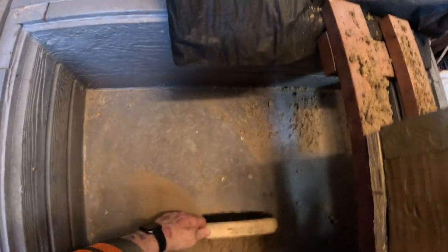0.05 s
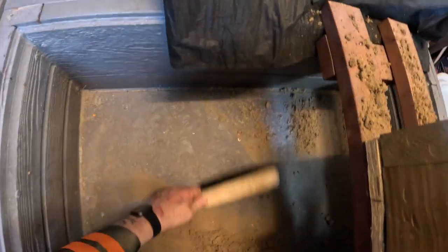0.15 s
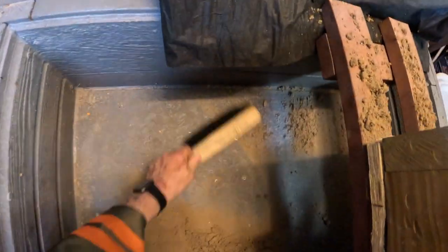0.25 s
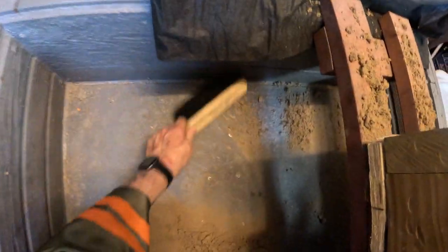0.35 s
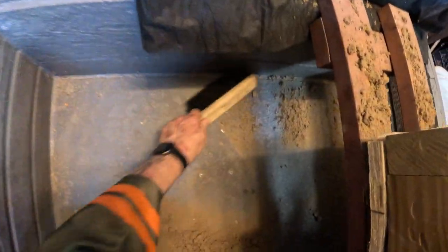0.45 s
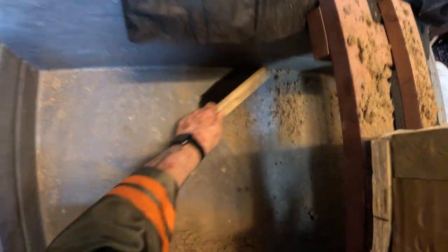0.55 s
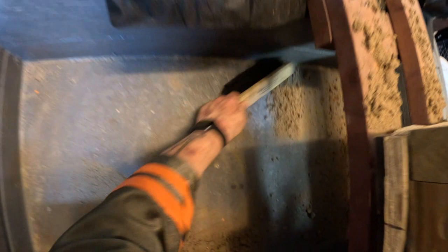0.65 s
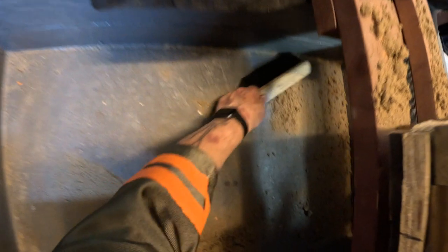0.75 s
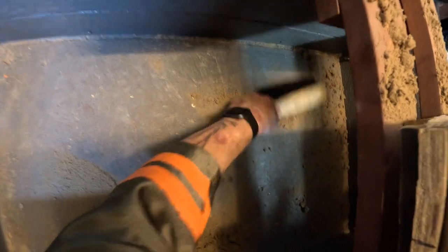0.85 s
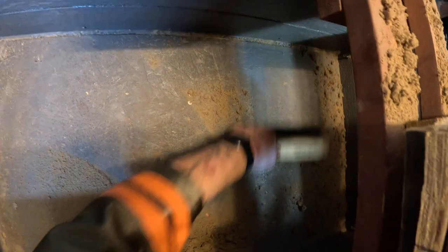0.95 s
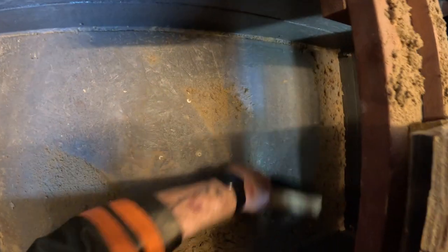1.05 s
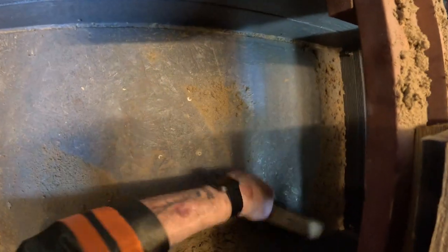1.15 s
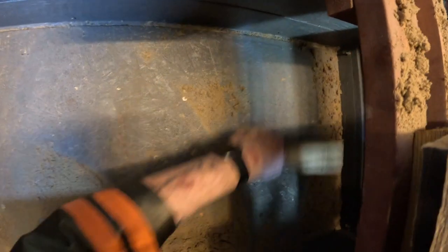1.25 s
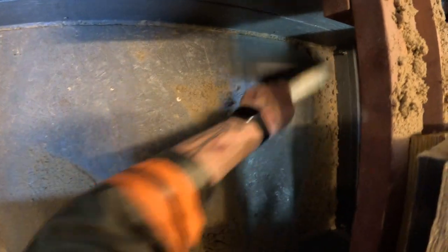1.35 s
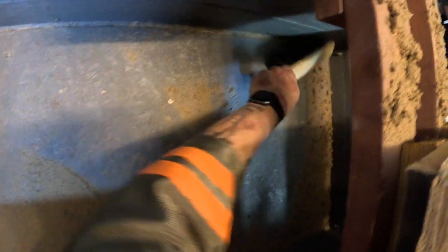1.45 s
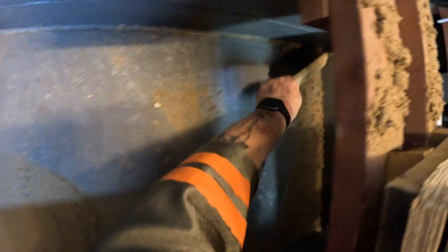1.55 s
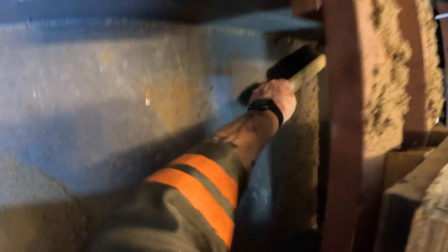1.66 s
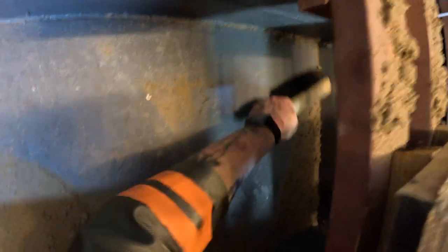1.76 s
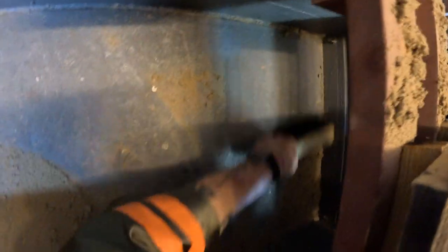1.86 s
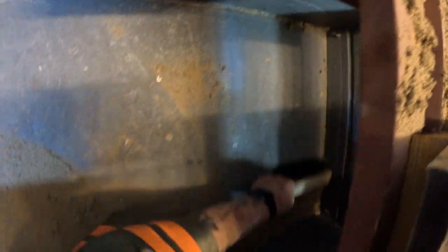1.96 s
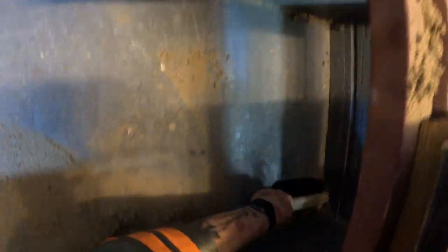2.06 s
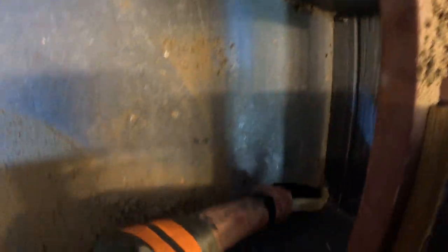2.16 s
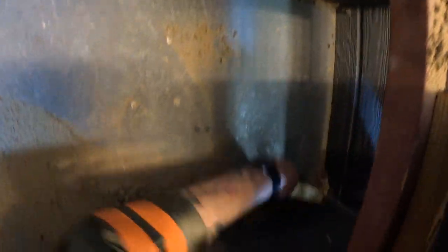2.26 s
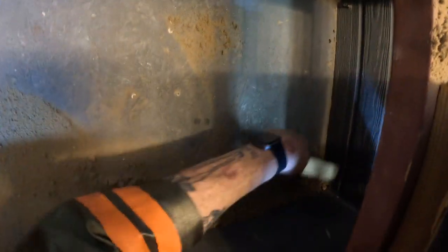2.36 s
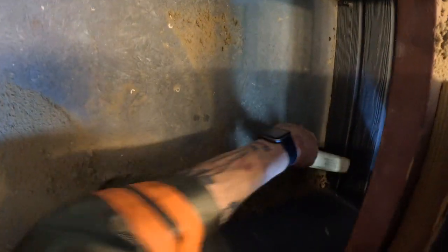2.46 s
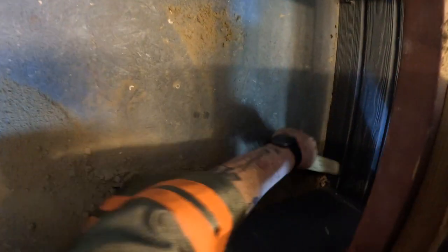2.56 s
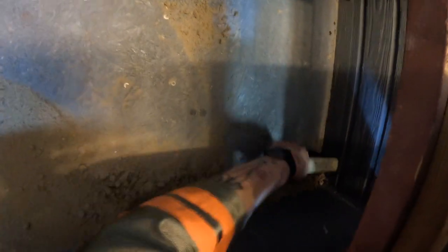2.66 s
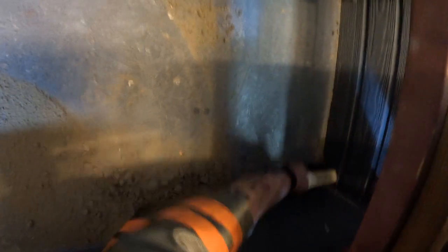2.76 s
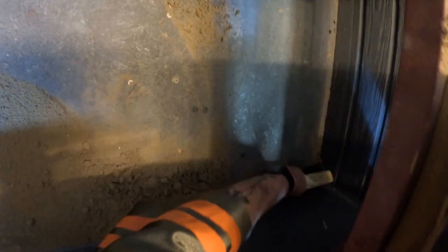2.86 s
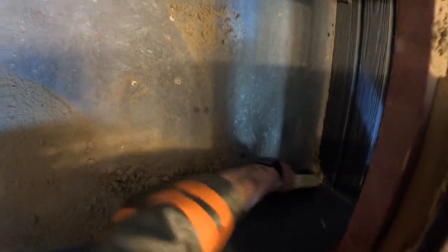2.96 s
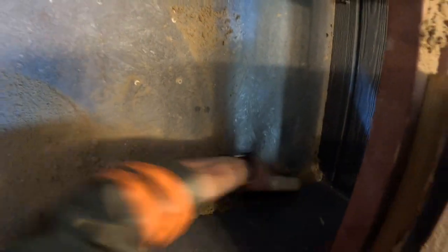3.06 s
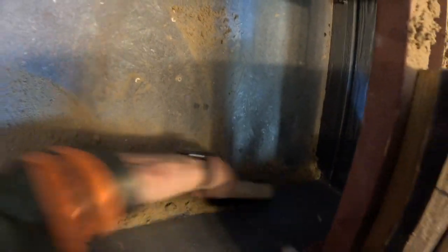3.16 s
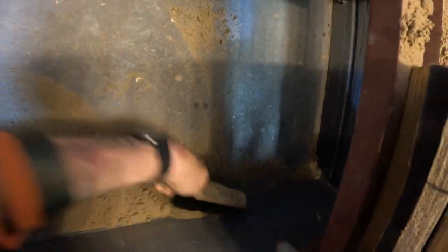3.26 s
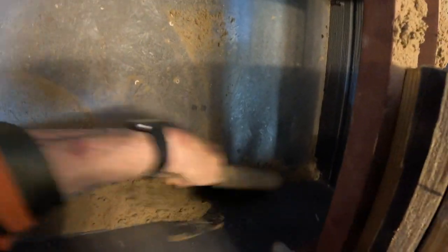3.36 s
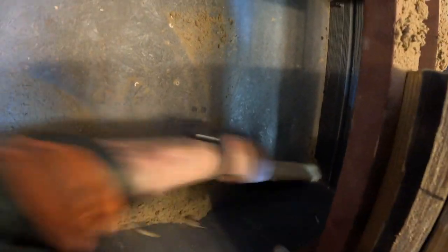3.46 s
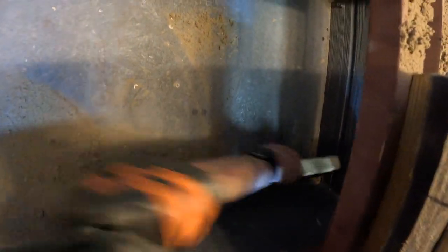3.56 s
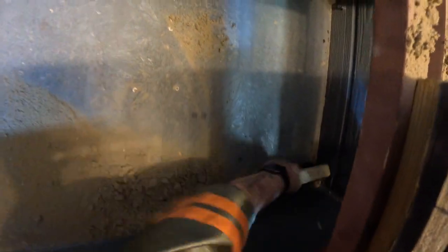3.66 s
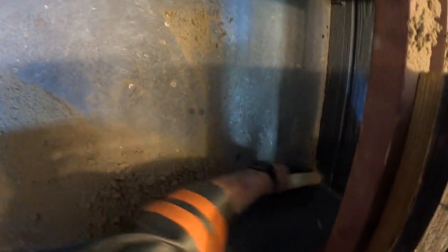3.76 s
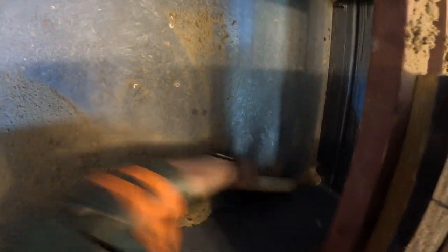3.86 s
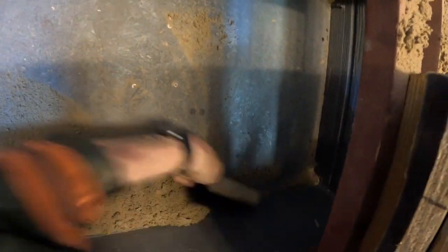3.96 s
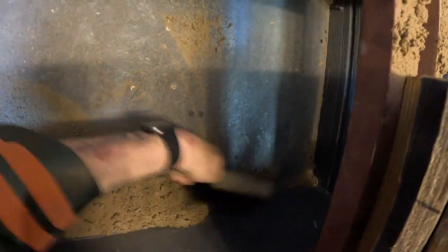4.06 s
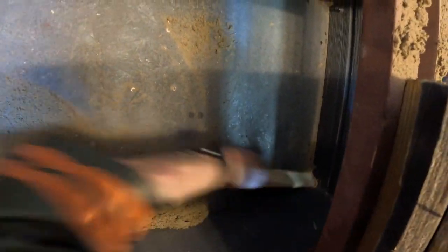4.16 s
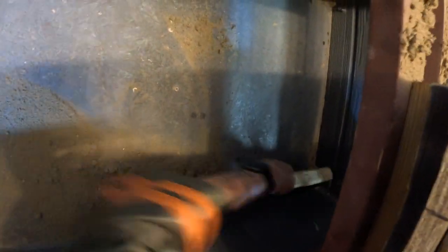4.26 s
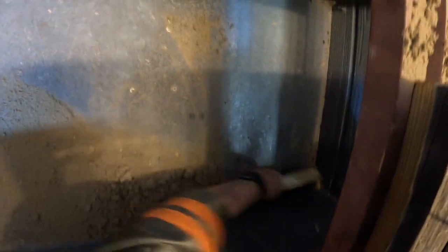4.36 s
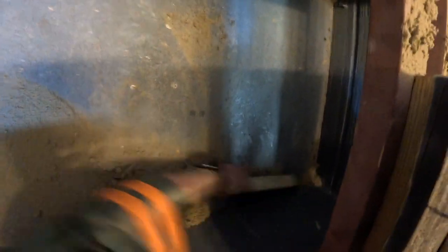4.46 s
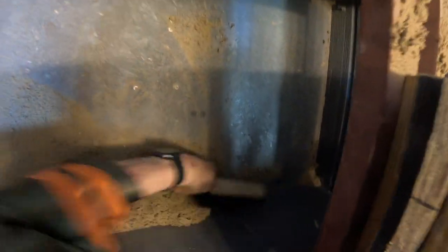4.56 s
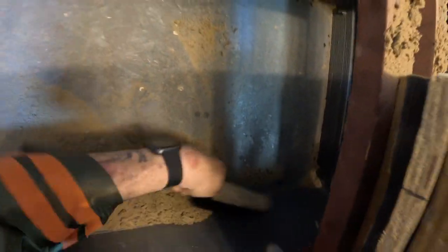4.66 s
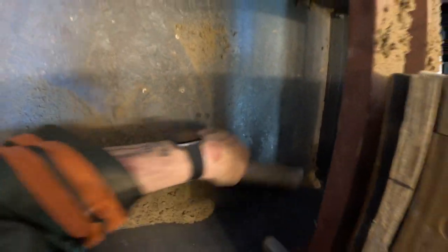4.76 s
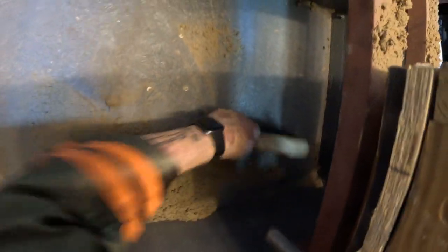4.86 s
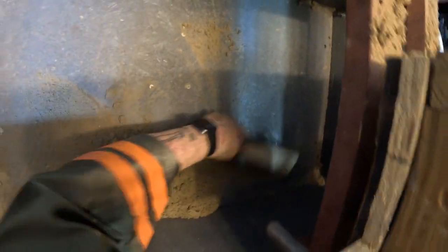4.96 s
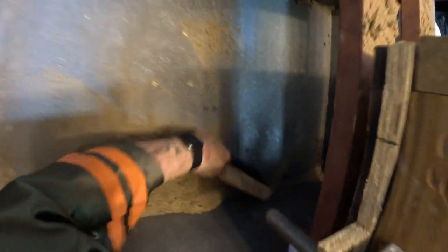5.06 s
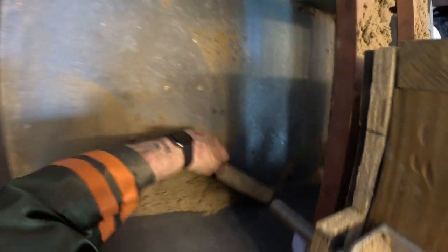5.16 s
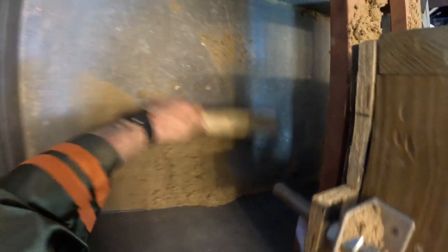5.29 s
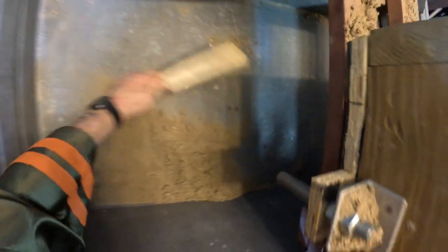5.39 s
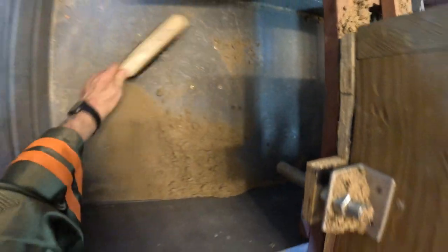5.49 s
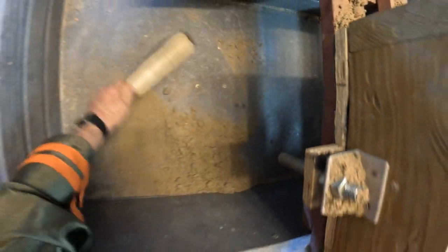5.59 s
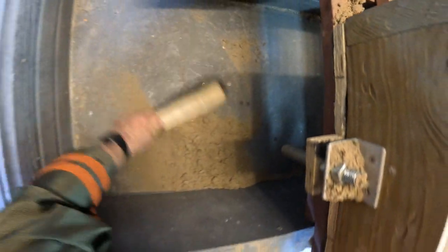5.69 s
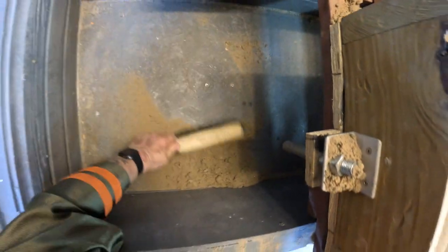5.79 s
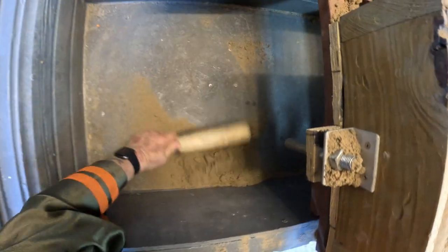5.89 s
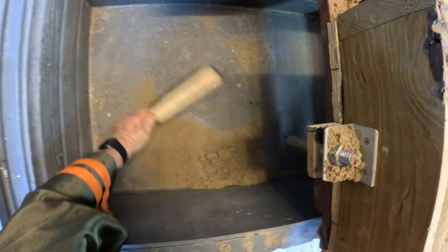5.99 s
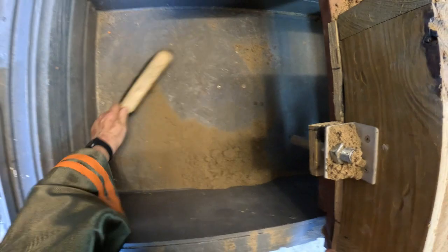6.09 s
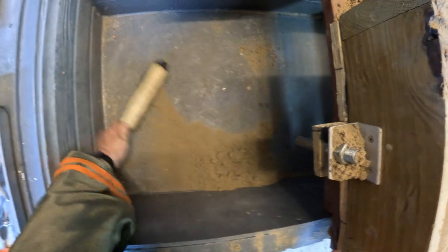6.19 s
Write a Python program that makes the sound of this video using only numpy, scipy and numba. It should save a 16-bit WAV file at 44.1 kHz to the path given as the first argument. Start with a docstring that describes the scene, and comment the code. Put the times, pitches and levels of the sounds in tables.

```python
"""A stiff hand brush sweeps loose sand over a large sheet tray in a small workshop, heard at arm's length.
A low room hum lies underneath, and the first stroke is already crunching through the grains as the scene opens.
Stroke follows stroke: bristles slap down, hiss and drag as shaped noise, and shake the tray's modes into a rumble.
Between and within strokes, whistling bands sound through moving resonances, and stray grains tick as noise bursts.
From 0.45 s the wooden back knocks and from 1.75 s also judders, ringing the tray, loudest from 1.7 to 5.2 s."""
import sys
import numpy as np
from scipy import signal
from scipy.fft import rfft, irfft, next_fast_len
from scipy.io import wavfile
from scipy.ndimage import uniform_filter1d
from numba import njit

SR = 44100
rng = np.random.default_rng(int(sys.argv[2]) if len(sys.argv) > 2 else 0)


def waveform_to_disk(signal):
    """Save audio, clipped to [-1, 1], as 16-bit WAV at the path in sys.argv[1]."""
    frames = np.transpose(np.atleast_2d(signal))
    scaled = np.clip(frames, -1, 1) * 32767
    samples = np.round(scaled).astype(np.int16)
    wavfile.write(sys.argv[1], SR, samples)


N = 274743
PADDED = next_fast_len(N)

# Colour of the workshop hum. Each row: frequency in Hz, relative level in dB per Hz.
HUM_COLOUR = [(12, -44.5), (20, -3), (45, -6.5), (65, -1.5), (92, -4.5), (132, -4.5), (211, -37.5),
              (360, -25), (560, -37), (850, -44.5), (1500, -30.5), (2690, -38), (3970, -35), (5240, -36),
              (8380, -44.5), (10800, -47.5), (15000, -65.5)]
HUM_DB = -48.5
# Faint treble rustle in the pauses. Each row: time in seconds, level in dB over the hum's own treble.
RUSTLE = [(0.2, -19), (0.36, -1.5), (0.44, 0.5), (2.4, -5), (2.6, 1), (2.7, 1), (3.44, -7), (3.54, -5.5),
          (3.61, -4), (3.65, 3.5), (3.698, -0.5), (3.77, 6.5), (4.15, 8), (4.25, -2), (4.44, 0.5),
          (5.3, 4.5), (5.36, -2), (5.45, -1.5), (5.55, -8), (6.1, 3), (6.22, -4)]
# Stereo width. Each row: frequency in Hz, side level over mid level in dB for equal inputs.
WIDTH = [(25, -7), (60, -32), (150, -25), (300, -12), (1000, -11), (2500, -6), (5000, -10), (8000, -12),
         (12000, -9)]
ROOM_T60_S, ROOM_DB = 0.29, -12.5

# Grains and bristle tips that tick alone. Each row: time in seconds, relative level in dB, centre in Hz.
TICKS = [(0.0967, -26.5, 4800), (0.3395, -44, 7500), (0.871, -20.5, 3440), (1.497, -27, 3000),
         (1.537, -21.5, 3500), (1.619, -23, 4700), (3.7367, -43, 5000), (3.8786, -40, 3000),
         (3.886, -19, 2850), (4.287, -33, 4240), (4.35, -50, 3500), (4.836, -34, 5000), (4.866, -42, 7500),
         (4.98, -36, 3250), (5.375, -42.5, 3700), (5.407, -49, 4600), (5.5508, -49, 3700),
         (6.021, -41, 7500), (6.075, -41, 5000), (6.148, -43, 6570)]

# Ringing modes of the tray. Each row: pitch in Hz, relative level in dB, free ring time (t60) in seconds.
TRAY_MODES = [(73.8, -4.5, 0.2), (96, -2.5, 0.23), (117.04, -0.5, 0.31), (143, 3, 0.13),
              (169.7, -2.5, 0.17), (215.8, -1.5, 0.19), (236, -7, 0.27), (262.2, -2, 0.19),
              (319.4, 4.5, 0.052), (366.2, -0.5, 0.13), (410.5, -0.5, 0.087), (463.5, -1.5, 0.17),
              (544, -3.5, 0.096), (597, -5, 0.14), (650, -10.5, 0.044), (757, -2, 0.086), (877, -7, 0.048),
              (946, -4.5, 0.09), (958, 1, 0.084), (1094, 0, 0.038), (1241, -3.5, 0.044), (1492, 3, 0.03),
              (1670, 4, 0.019), (1787, 3.5, 0.031), (2160, -3, 0.026), (2610, -2, 0.034), (2780, 1, 0.013),
              (3480, -2, 0.0059)]
# Where wood meets tray. Each name: strongest low pitch in Hz, strongest high pitch in Hz, then the
# relative mode level in dB near each of the knock bands.
SPOTS = {"floor": (122, 1501, -5, -24, -40, -24, -10), "flat": (119.5, 1349, -13.5, -24.5, -24, -12, -11),
         "middle": (278, 1468, -17, -3, -26, -29, -19), "heel": (145.5, 904, -3.5, -16, -22.5, -48, -39),
         "edge": (368, 937, -21, -8.5, -14.5, -11, -29), "wall": (267, 547, -15.5, -8, -9, -25, -34),
         "slide": (222, 547, -4, -4, -11, -11, -22.5), "corner": (463.5, 1122, -11.5, -15, -5, -14, -47),
         "rim": (159, 865, -7.5, -7.5, -4.5, -15.5, -41), "brim": (606, 980, -13, -7, -12, -15.5, -41),
         "belly": (118, 366, -3.5, -20, -36, -40, -50), "knuckle": (219, 545, -6.5, -2, -10.5, -22, -17),
         "nook": (469, 1120, -14, -15, -7.5, -12, -48), "rub": (266, 758, -9.5, -12, -12.5, -13.5, -30),
         "rattle": (264, 964, -3.5, -5, -11.5, -13, -13), "lip": (241, 2607, -5.5, -9, -9.5, -10.5, -23),
         "side": (544, 1490, -12, -7.5, -11.5, -15.5, -17), "foot": (263, 798.5, -7.5, -8.5, -8, -16, -30),
         "seam": (268, 411, -5.5, -8.5, -10, -16.5, -30.5), "tips": (93.5, 1301, -11, -3, -17, -13, -4.5)}
# Band centres for the colour of a blow. Each entry: frequency in Hz.
KNOCK_BANDS_HZ = [125, 280, 650, 1500, 4000]
FAVOUR_DB, FAVOUR_WIDTH = 12.5, 0.091  # lift of a spot's two pitches; its width in natural log of Hz
# Knocks of the wooden back. Each row: time in seconds, relative level in dB, hardness in dB gained per band
# upwards, share of the free ring time, spot.
KNOCKS = [(0.451, -14, 1, 1.2, "flat"), (1.185, -24, -8, 0.47, "edge"), (1.29, -21.5, -1, 0.64, "edge"),
          (1.434, -22, -0.5, 0.54, "heel"), (1.522, -19, 2, 0.53, "heel"),
          (1.553, -23.5, 1.5, 0.88, "edge"), (1.619, -14.5, -0.8, 0.49, "heel"),
          (1.689, -12.5, -1, 0.44, "heel"), (1.729, 2, 0, 0.78, "lip"), (1.81, -19, 0, 0.6, "side"),
          (1.839, -17, 2.5, 0.54, "side"), (1.862, -9.5, 2.5, 0.68, "slide"), (1.882, -8, 0, 1.06, "slide"),
          (1.941, -5, -1.5, 0.7, "knuckle"), (1.965, -6.5, -0.5, 0.77, "side"),
          (2.258, -4.5, -2.5, 0.57, "corner"), (2.299, -10, -3, 0.61, "nook"),
          (2.321, -8.5, -2, 0.35, "nook"), (2.721, -13, -1.2, 0.89, "tips"),
          (2.738, 4.5, -0.5, 0.61, "foot"), (2.895, -6.5, -3, 0.58, "wall"),
          (3.789, -18, 3.5, 0.37, "tips"), (3.804, 0.5, 0, 0.99, "seam"), (4.459, -18.5, 4, 0.86, "corner"),
          (4.731, -25, -3.5, 0.59, "floor"), (4.837, -20, 2.5, 0.71, "floor"),
          (4.889, -19.5, -0.6, 0.92, "floor"), (4.948, -24.5, 2, 0.96, "floor"),
          (5.028, 3.5, 0.5, 0.52, "middle"), (5.03, -5.5, -1.5, 1.03, "belly"),
          (5.184, -1.5, -1.1, 0.93, "rim"), (5.237, -26, -3, 0.6, "rim"), (5.249, -18, -6, 0.55, "rim"),
          (5.256, -17, -1.5, 0.3, "heel"), (5.595, -18.5, -4.5, 1.05, "flat")]
SCATTER_DB = 1.2  # random spread of mode levels from blow to blow
# Crack of a blow. Each row: lower edge in Hz, upper edge in Hz, level in dB over the blow's band, t60 in seconds.
CRACKS = [(300, 930, -15, 0.12), (1010, 3050, -8.5, 0.038), (2180, 5400, -8.5, 0.027),
          (500, 1280, -5, 0.012)]
CRACK_RISE_S = 0.0018
# The wooden back judders along a wall. Each row: start in seconds, end in seconds, level in dB at the start,
# level in dB at the end, spot.
SCRAPES = [(1.75, 1.863, -20, -20.5, "rub"), (1.868, 1.937, -12, -20, "rattle"),
           (2.752, 2.86, -17.5, -24, "wall"), (3.812, 3.888, -22.5, -16, "rub"),
           (5.047, 5.091, -19, -20, "middle"), (5.203, 5.263, -23.5, -11.5, "brim"),
           (5.265, 5.34, -28, -42, "wall")]
JUDDERS_PER_S, JUDDER_SHARE = 250, 0.45  # mean catches at each contact point; share of the free ring time
JUDDER_FAVOUR, JUDDER_DETUNE = 0.5, 0.04  # share of a spot's favour; random spread as a share of pitch

# Colours of fine sand, coarse sand and bristle drag. Each row: frequency in Hz, relative level in dB per Hz.
FINE_COLOUR = [(2120, -41), (3600, -1.5), (6370, -4.5), (7230, -4.5), (8600, -12.5), (10500, -12),
               (13600, -26.5), (14200, -21.5), (15100, -53.5)]
COARSE_COLOUR = [(1200, -6.5), (1900, 3), (2600, 2.5), (3400, -0.5), (5000, -35.5)]
DRAG_COLOUR = [(300, -9.5), (600, -6), (950, 2), (1400, 1), (1900, -2), (2800, -60.5)]
# Brush strokes. Each row: contact ramp start in seconds, a level time in seconds, fade start in seconds (any
# order), fine sand level in dB at those three moments once sorted in time, fade in dB per second, coarse sand
# in dB over the fine, drag in dB over the fine, tray rumble in dB when the fine sand is at its third level.
STROKES = [(-0.1, 0.0, 0.097, -46, -44.5, -41.5, 163, 0, -4.5, -41),
           (0.48, 0.55, 0.67, -48, -51.5, -49.5, 148, -1, -2, -54),
           (0.636, 0.696, 1.01, -62, -44.5, -40.5, 100, -0.5, -1.5, -39.5),
           (0.897, 1.05, 1.221, -67, -39.5, -38.5, 402, -2, -2, -41.5),
           (1.238, 1.287, 1.275, -45, -56, -42.5, 200.3, 1.5, -2, -38.5),
           (1.409, 1.577, 1.78, -60.5, -50.5, -48.5, 250, 2, -1.5, -40.5),
           (1.792, 1.94, 2.176, -50, -33.5, -40, 103, -2.5, -4, -43),
           (2.294, 2.307, 2.218, -65, -36, -25.5, 312, -1, 2, -50),
           (2.766, 2.867, 2.96, -54, -46.5, -56.5, 160, -3, 1.5, -38.5),
           (2.953, 3.223, 3.394, -56.5, -37.5, -42, 340, -1, 1, -68),
           (3.83, 3.891, 4.047, -72, -39, -36.5, 210, 0.5, -0.5, -47.5),
           (4.49, 4.575, 4.679, -44.5, -34.5, -34.5, 181, -3.5, -1.5, -49),
           (5.045, 5.106, 5.11, -44, -33.5, -31.5, 243, -2.5, -1.5, -42),
           (5.207, 5.233, 5.32, -52, -49.5, -70, 203, 2, 6, -55.5),
           (5.604, 5.727, 5.8, -48, -49, -53, 150, -4.5, -6.5, -48.5),
           (5.713, 5.852, 5.924, -50, -34, -39.5, 440, -12, -27, -76),
           (6.115, 6.158, 6.3, -71, -56, -56.5, 130, -20, -28, -89)]
CONTACT_S, RUMBLE_SHARE = 0.024, 0.65  # contact ramp; the rumble moves by this share of the hiss's dB
SETTLE_DB, SETTLE_S = -29.5, 0.022  # thrown sand trickles on after the bristles
# The bristles slap down. Each row: time in seconds, fine sand level in dB.
LANDINGS = [(0.45, -33.5), (1.727, -70), (2.258, -67), (2.721, -32.5), (2.74, -59), (3.789, -31),
            (4.458, -29.5), (5.025, -30), (5.599, -45.5)]
SLAP_RISE_S, SLAP_FADE_DB_S = 0.01, 605
SLAP_COARSE_DB, SLAP_DRAG_DB = 1, 1  # over the fine sand
# Whistling bands between and within strokes. Each row: start in seconds, end in seconds, coarse sand in dB at
# the start and at the end, lower and upper whistle pitch in Hz before sag and wander, their levels in dB over
# the coarse sand, tray rumble in dB.
WHISTLES = [(0.1, 0.376, -50.5, -62, 1830, 2600, 5.5, -16, -59),
            (1.367, 1.584, -47, -55, 1860, 3400, 7.5, -7.5, -69),
            (2.355, 2.627, -59, -73, 1830, 2500, 9, -6.5, -52.5),
            (3.402, 3.54, -73, -62.5, 1780, 2380, 10, -7, -58),
            (4.082, 4.282, -80, -93.5, 1490, 2940, 16, 3, -52),
            (4.559, 4.66, -41, -39, 1740, 1050, 5.5, -22, -70),
            (4.73, 5.085, -59, -51, 1800, 3390, 7, -3.5, -53.5),
            (5.362, 5.611, -73.5, -58.5, 1970, 2670, 2.5, -10, -57),
            (5.745, 5.931, -63, -55, 1440, 2960, 8, -3, -80),
            (5.827, 5.882, -64, -66, 4250, 5200, 1, -5, -73),
            (5.904, 6.094, -54, -51, 1870, 2630, 0, -8, -49.5)]
WHISTLE_FINE_DB, WHISTLE_DRAG_DB = -16, -12  # sand that goes with a whistle, over its coarse sand
WHISTLE_EDGE_S, WHISTLE_SAND_PAN_DB = 0.075, 1.5  # fade ramp; left minus right
STILL_RUMBLE_DB = -61
STEP = 8  # samples for each gain value
# Ring times of the lower and the upper whistle band. Each entry: t60 in seconds.
WHISTLE_T60_S = (0.016, 0.032)
WANDER, SAG_PER_S = 0.015, 0.12  # share of pitch; share of pitch lost per second
SWELL_DB = 1.2

# Treble balance of the left port. Each row: frequency in Hz, level in dB over the right port.
LEFT_PORT = [(3000, 0), (6000, -0.06), (9000, 1), (13000, 1.4)]
PORT_LAG_S, TOP_HZ = 1.1e-5, 14900
LIMIT_DB, LIMIT_RATIO, ATTACK_S, RELEASE_S = -15, 1.36, 0.0013, 0.075


def undb(db):
    """Turns dB into a gain."""
    return 10 ** (np.asarray(db) / 20)


def unit(x):
    """Scales a sound to an RMS of 1."""
    return x / np.sqrt(np.mean(x ** 2))


def colour(x, table):
    """Filters by a (Hz, dB) table, interpolated over log frequency."""
    hz, db = np.transpose(table)
    f = np.maximum(np.fft.rfftfreq(PADDED, 1 / SR), 1)
    gain = undb(np.interp(np.log(f), np.log(hz), db))
    return irfft(rfft(x, PADDED) * gain, PADDED)[..., :x.shape[-1]]


def walk(rate):
    """Random levels held for 1 / rate s and smoothed twice, with an RMS of 1."""
    hold = int(SR / rate)
    steps = np.repeat(rng.standard_normal(N // hold + 1), hold)
    return unit(uniform_filter1d(uniform_filter1d(steps, hold), hold)[:N])


def spread(mid, side):
    """Left and right from a centre sound and an unrelated side sound."""
    side = colour(side, WIDTH)
    return np.array([mid + side, mid - side])


def hum():
    """The workshop's low, wavering noise; its faint treble follows the rustle levels and flickers."""
    mid, side = (unit(colour(rng.standard_normal(N), HUM_COLOUR)) for _ in range(2))
    both = spread(mid, side)
    bass = signal.sosfilt(signal.butter(2, 500, fs=SR, output="sos"), both)
    treble = both - bass
    bass_db = 1.5 * walk(13) + 1.8 * walk(4)
    treble_db = np.interp(np.arange(N) / SR, *np.transpose(RUSTLE)) + walk(18)
    return undb(HUM_DB) * (bass * undb(bass_db) + treble * undb(treble_db))


def room(x):
    """Close walls answer with a short, dull noise tail, partly different left and right."""
    t = np.arange(int(.5 * SR)) / SR
    tails = rng.standard_normal((2, len(t))) * 1000 ** (-t / ROOM_T60_S) * (t > .003)
    tails = colour(tails / np.sqrt(np.sum(tails[0] ** 2)), [(200, 3.5), (2000, 4.5), (8000, -14)])
    mid, side = (signal.fftconvolve(x, tail)[:N] for tail in tails)
    return undb(ROOM_DB) * spread(mid, undb(6.0) * side)


def ticks():
    """Single grains: short fading noise bursts, each banded around one pitch."""
    out, t = np.zeros(N), np.arange(600) / SR
    for s, db, hz in TICKS:
        sos = signal.butter(2, (hz / 2, hz * 1.8), "band", fs=SR, output="sos")
        burst = unit(signal.sosfilt(sos, rng.standard_normal(len(t)))) * 1000 ** (-t / 0.024)
        first = int(s * SR)
        out[first:first + len(t)] += undb(db - 10.0) * burst
    return out


def ring(x, hz, t60):
    """One mode as a two-pole resonator; a unit blow starts a sine of size 1."""
    r, w = np.exp(-np.log(1000) / (t60 * SR)), 2 * np.pi * hz / SR
    return signal.lfilter([0, r * np.sin(w)], [1, -2 * r * np.cos(w), r * r], x)


def crunch(spread_db):
    """Very many tiny grain breaks as signed clicks, and now and then a larger piece of grit."""
    grit = undb(10.0) * (rng.random(N) < .005)
    grains = undb(spread_db * np.minimum(rng.exponential(size=N), 5.0))
    return unit(rng.standard_normal(N) * (grains + grit))


def rumble(gain):
    """The stroke shakes the tray in soft, uneven jolts, the low modes most."""
    jolts = crunch(spread_db=2.5) * undb(3.5 * walk(20))
    # the push weakens by 4.65 dB per octave upwards
    shake = sum(undb(db - 4.65 * np.log2(hz / 118)) * ring(jolts, hz, t60) for hz, db, t60 in TRAY_MODES[:18])
    tone = [(40, -35.0), (90, -8.0), (120, -2), (170, -6.0), (250, -6.5),
            (350, 1.5), (480, -3.5), (1500, -2.0), (3000, -4.5)]  # (Hz, dB)
    return gain * unit(colour(shake, tone))


def favour(hz, low_hz, high_hz):
    """dB by which a spot lifts the modes near its two pitches over the others."""
    return sum(FAVOUR_DB * np.exp(-(np.log(hz / f) / FAVOUR_WIDTH) ** 2) for f in (low_hz, high_hz)) - 9.0


def scrapes():
    """Quick uneven catches of wood ring tray modes, damped and detuned by the brush that slides on them."""
    free_hz, mode_db, t60 = np.transpose(TRAY_MODES)[:, :, None]
    out, t = np.zeros(N), np.arange(5000) / SR
    for start, end, start_db, end_db, name in SCRAPES:
        low_hz, high_hz, *bands_db = SPOTS[name]
        db = np.interp(np.log(free_hz), np.log(KNOCK_BANDS_HZ), bands_db) + mode_db
        db = db + JUDDER_FAVOUR * favour(free_hz, low_hz, high_hz)
        for _ in range(3):  # three points of contact, each with its own tuning
            hz = free_hz * (1 + JUDDER_DETUNE * rng.standard_normal(free_hz.shape))
            fade = undb(db) * 1000 ** (-t / (t60 * JUDDER_SHARE))
            swing = 1 - np.exp(-(t * hz) ** 2)
            tones = np.sin(2 * np.pi * (hz * t + rng.random(hz.shape)))
            body = np.sum(fade * swing * tones, axis=0)
            count = int((end - start) * SR)
            caught = rng.random(count) < JUDDERS_PER_S / SR
            catches = caught * rng.uniform(-1, 1, count) * undb(np.linspace(start_db, end_db, count))
            sound = signal.fftconvolve(catches, body)
            first = int(start * SR)
            out[first:first + len(sound)] += sound
    return out


def knocks():
    """Each blow rings the tray modes by its own colour, with a short noise crack of sand and wood."""
    hz, mode_db, t60 = np.transpose(TRAY_MODES)[:, :, None]
    out, t = np.zeros(N), np.arange(10000) / SR
    # the push is soft: a mode takes about a cycle to swing up
    swing = 1 - np.exp(-(t * hz / 0.86) ** 2)
    sine, cosine = swing * np.sin(2 * np.pi * hz * t), swing * np.cos(2 * np.pi * hz * t)
    short = t[:3000]
    cracks = []
    for lo_hz, hi_hz, db, crack_t60 in CRACKS:
        sos = signal.butter(2, (lo_hz, hi_hz), "band", fs=SR, output="sos")
        cracks.append((sos, undb(db) * 1000 ** (-short / crack_t60) * np.minimum(short / CRACK_RISE_S, 1)))
    for s, level_db, hard_db, share, name in KNOCKS:
        low_hz, high_hz, *bands_db = SPOTS[name]
        # a harder blow tilts the colour upwards; a weak bump is also soft and loses its upper bands
        bands_db = np.array(bands_db, float) + hard_db * (np.arange(len(bands_db)) - 2)
        bands_db[3:] -= 1.5 * max(-17 - level_db, 0)
        # the struck spot favours two modes and scatters the others
        favour_db = favour(hz, low_hz, high_hz) + SCATTER_DB * rng.standard_normal(hz.shape)
        db = np.interp(np.log(hz), np.log(KNOCK_BANDS_HZ), bands_db) + mode_db + favour_db
        # a resting brush or hand shortens the ring; a few blows, with a share above 1, ring longer than free
        fade = undb(db) * np.exp(-np.log(1000) * t / (t60 * share))
        phase = 3 * rng.standard_normal(hz.shape)
        blow = np.sum(fade * (np.cos(phase) * sine + np.sin(phase) * cosine), axis=0)
        for (sos, tail), band_db in zip(cracks, bands_db[[2, 3, 4, 2]]):
            noise = unit(signal.sosfilt(sos, rng.standard_normal(len(tail))))
            blow[:len(tail)] += undb(band_db) * tail * noise
        first = int(s * SR)
        out[first:first + len(t)] += undb(level_db) * blow
    # the thin sheet radiates no deep bass
    return signal.sosfilt(signal.butter(2, 58, "high", fs=SR, output="sos"), out)


@njit
def sing(x, hz, keep):
    """A decaying complex rotation: a resonance whose pitch may move every sample."""
    y, z = np.empty(len(x)), 0j
    for i in range(len(x)):
        z = z * keep * np.exp(2j * np.pi * hz[i] / SR) + x[i]
        y[i] = z.imag
    return y


def whistle(gains, noise):
    """Noise rings smoothly in pairs of resonant bands, which sag and wander in pitch and swell unevenly."""
    out = np.zeros_like(noise)
    wander, swell = [walk(10), walk(8.9)], [walk(25), walk(25)]
    for gain, row in zip(gains, WHISTLES):
        span = slice(max(int((row[0] - .1) * SR), 0), int((row[1] + .1) * SR))
        for hz, db, t60, drift, puff in zip(row[4:6], row[6:8], WHISTLE_T60_S, wander, swell):
            sag = SAG_PER_S * np.arange(len(drift[span])) / SR
            pitch = hz * (1 + WANDER * drift[span] - sag)
            keep = 1000 ** (-1 / (t60 * SR))
            band = np.array([sing(x[span], pitch, keep) for x in noise])
            out[:, span] += gain[span] * undb(db + SWELL_DB * puff[span]) * unit(band)
    return out


def sand():
    """Fine and coarse sand hiss under the bristles; the bent tufts drag in a duller, more uneven scrape."""
    patchy = walk(30)  # shared by all three layers
    layers = []
    for table, spread_db, flicker_db, swell_db in ((FINE_COLOUR, 1.8, .8, .7), (COARSE_COLOUR, 1.8, 1.2, 1.0),
                                                   (DRAG_COLOUR, 2.1, 1.6, 1.2)):
        mid, side = (unit(colour(crunch(spread_db), table)) for _ in range(2))
        uneven_db = 1.56 * patchy + flicker_db * walk(45) + swell_db * walk(13)
        layers.append(spread(mid, side) * undb(uneven_db))
    return np.array(layers)


def brush(t):
    """Gains of fine sand, coarse sand, drag and rumble for the strokes, the slaps and each whistle."""
    strokes, slaps = np.zeros((2, 4, len(t)))
    for ramp_start, level_time, fade_start, *db, fade_db_s, coarse_db, drag_db, rumble_db in STROKES:
        fine_db = np.interp(t, sorted((ramp_start, level_time, fade_start)), db)
        fine_db = fine_db - fade_db_s * np.maximum(t - fade_start, 0)
        shake_db = rumble_db + RUMBLE_SHARE * (fine_db - db[2])
        contact = np.clip((t - ramp_start) / CONTACT_S, 0, 1)
        strokes += contact * undb([fine_db, fine_db + coarse_db, fine_db + drag_db, shake_db])
    keep = np.exp(-STEP / (SETTLE_S * SR))
    strokes[:2] += undb(SETTLE_DB) * signal.lfilter([1 - keep], [1, -keep], strokes[:2])
    for s, db in LANDINGS:
        down = np.clip((t - s) / SLAP_RISE_S + .5, 0, 1) ** 2
        fine_db = db - SLAP_FADE_DB_S * np.maximum(t - s, 0)
        slaps[:3] += down * undb([fine_db, fine_db + SLAP_COARSE_DB, fine_db + SLAP_DRAG_DB])
    whistles = []
    for start, end, *ends_db, _, _, _, _, rumble_db in WHISTLES:
        near = np.clip(np.minimum(t - start, end - t) / WHISTLE_EDGE_S + .5, 0, 1) ** 3
        db = np.interp(t, (start, end), ends_db)
        gains_db = [db + WHISTLE_FINE_DB, db, db + WHISTLE_DRAG_DB, np.full(len(t), rumble_db)]
        whistles.append(near * undb(gains_db))
    return strokes, slaps, np.array(whistles)


def scene():
    """Sums hum, tray with its room answer, whistling bands and the sweeping sand."""
    gains = brush(np.arange(0, N, STEP) / SR)
    strokes, slaps, each_whistle = (np.repeat(gain, STEP, axis=-1)[..., :N] for gain in gains)
    with_whistles = each_whistle.sum(axis=0)
    grains = sand()
    pan = undb([[WHISTLE_SAND_PAN_DB / 2], [-WHISTLE_SAND_PAN_DB / 2]])
    sweep = np.sum((strokes + slaps)[:3, None] * grains, axis=0)
    sweep += pan * np.sum(with_whistles[:3, None] * grains, axis=0)
    whistling = whistle(each_whistle[:, 1], spread(*rng.standard_normal((2, N))))
    shaking = rumble(strokes[3] + with_whistles[3] + undb(STILL_RUMBLE_DB))
    tray = knocks() + scrapes() + ticks() + shaking
    return hum() + tray + room(tray) + whistling + sweep


@njit
def follow(x, attack, release):
    """Envelope that rises fast and falls slowly."""
    y, e = np.empty(len(x)), 1e-6
    for i in range(len(x)):
        e += (x[i] - e) * (attack if x[i] > e else release)
        y[i] = e
    return y


def record(dry):
    """The left port hears a little late and brighter; gain control ducks loud sound; the top is cut."""
    lag = np.exp(-2j * np.pi * np.fft.rfftfreq(PADDED, 1 / SR) * PORT_LAG_S)
    late = irfft(rfft(dry[0], PADDED) * lag, PADDED)[:N]
    both = np.array([colour(late, LEFT_PORT), dry[1]])
    loud = follow(np.abs(both).max(axis=0), 1 / (ATTACK_S * SR), 1 / (RELEASE_S * SR))
    both = both * np.minimum(undb(LIMIT_DB) / loud, 1) ** (1 - 1 / LIMIT_RATIO)
    return signal.sosfilt(signal.ellip(10, .2, 70, TOP_HZ, fs=SR, output="sos"), both)


dry = scene()
out = record(dry)
waveform_to_disk(out)
```